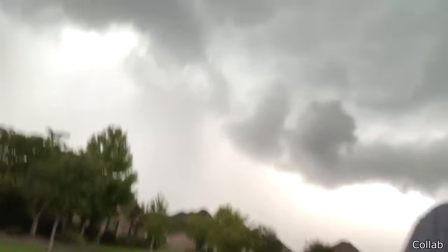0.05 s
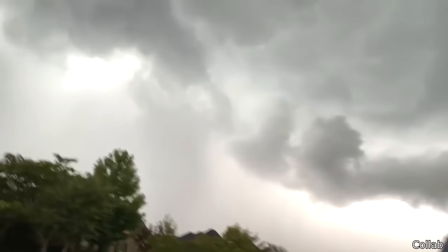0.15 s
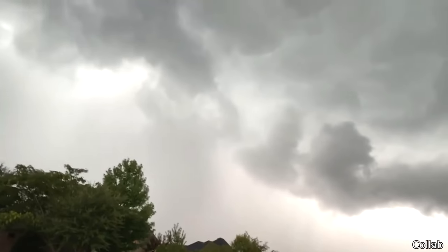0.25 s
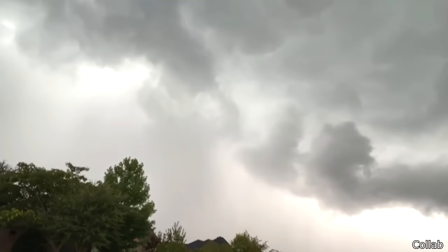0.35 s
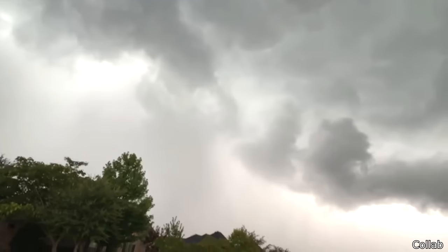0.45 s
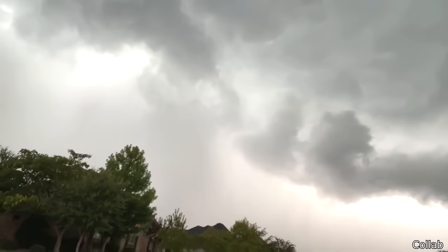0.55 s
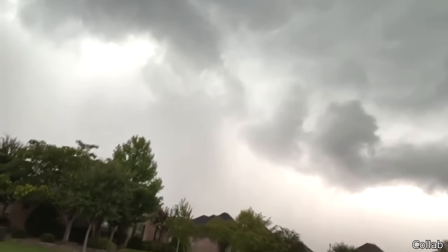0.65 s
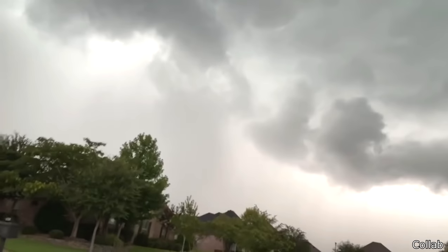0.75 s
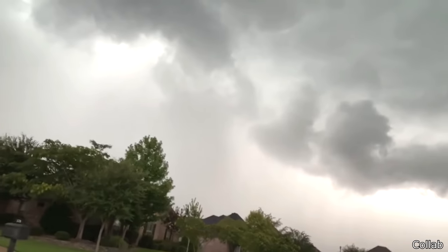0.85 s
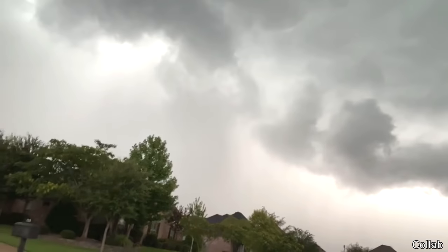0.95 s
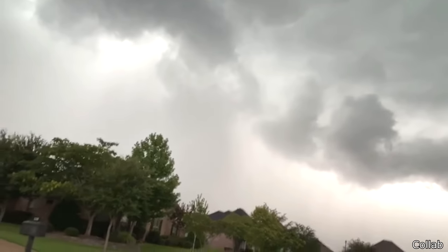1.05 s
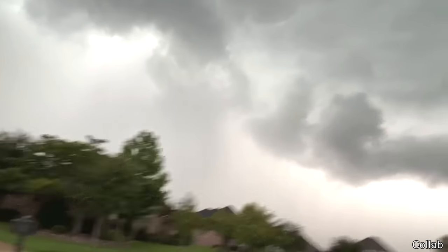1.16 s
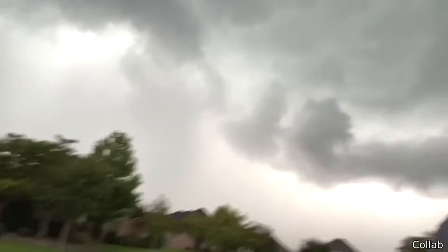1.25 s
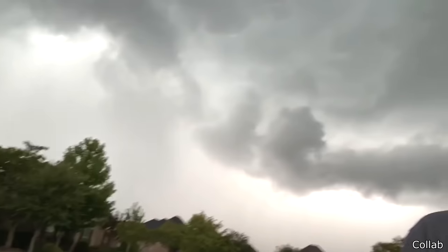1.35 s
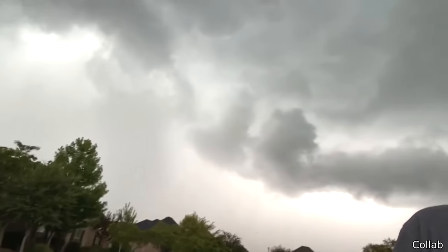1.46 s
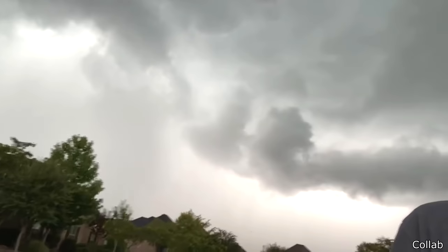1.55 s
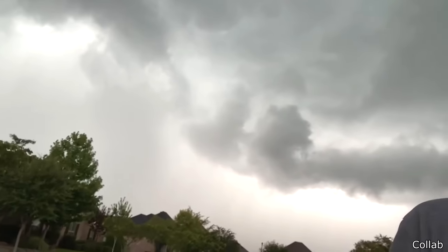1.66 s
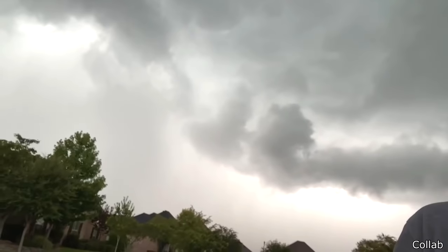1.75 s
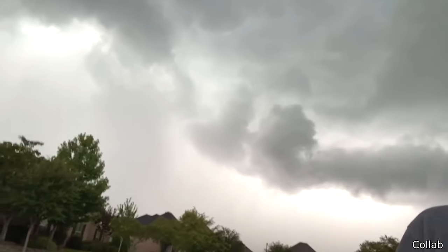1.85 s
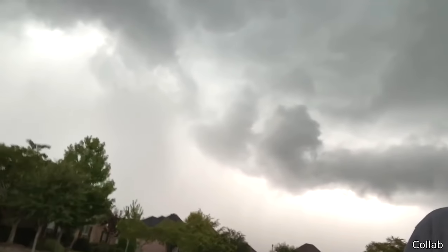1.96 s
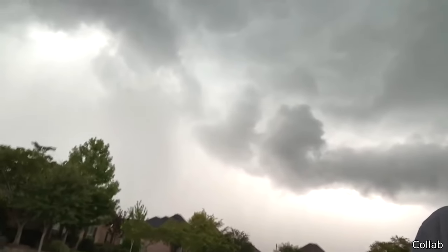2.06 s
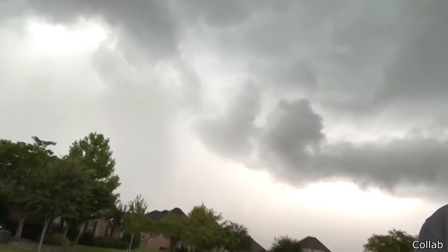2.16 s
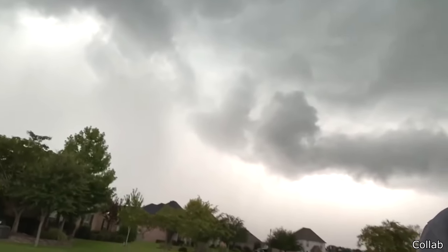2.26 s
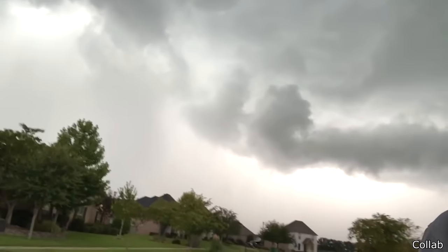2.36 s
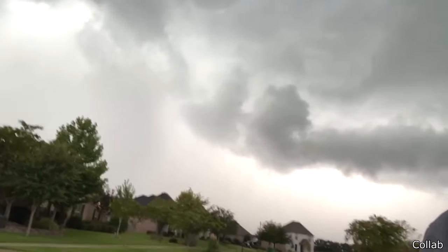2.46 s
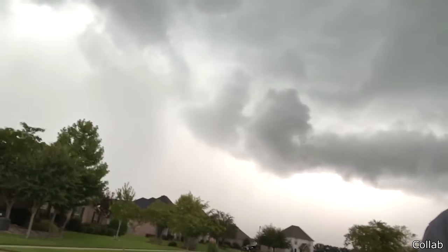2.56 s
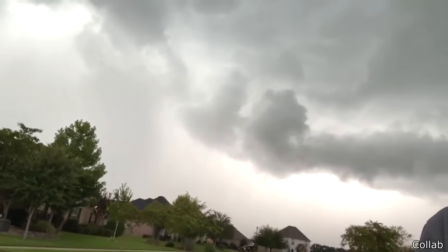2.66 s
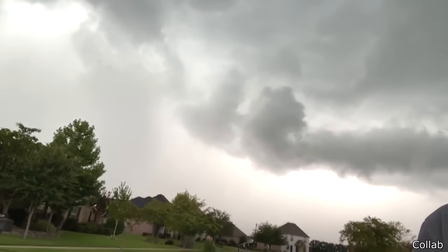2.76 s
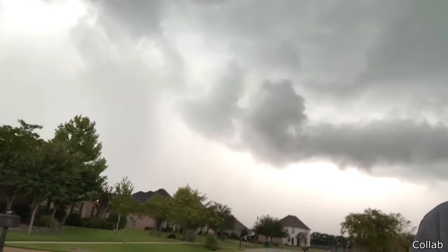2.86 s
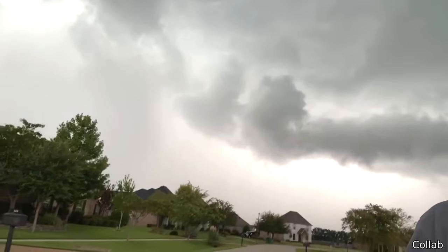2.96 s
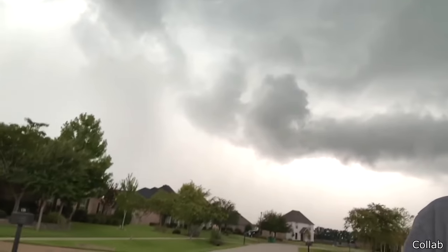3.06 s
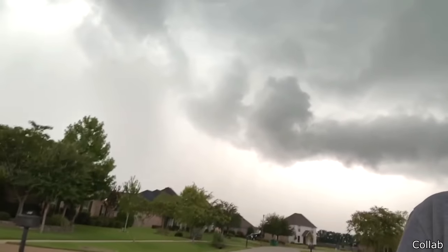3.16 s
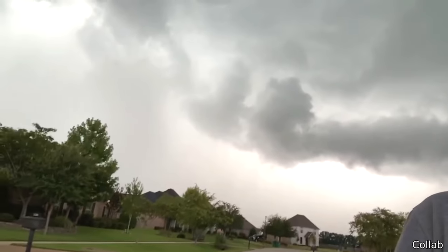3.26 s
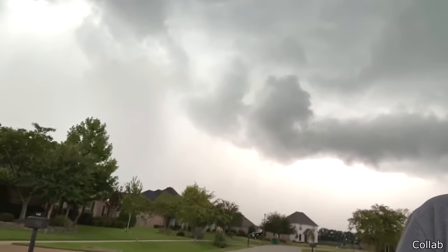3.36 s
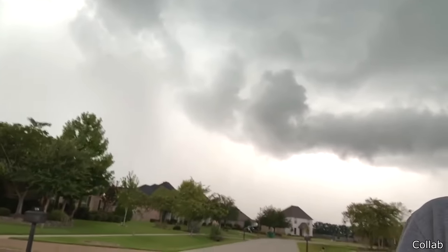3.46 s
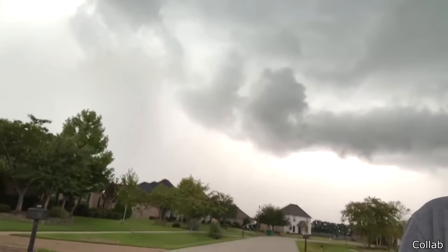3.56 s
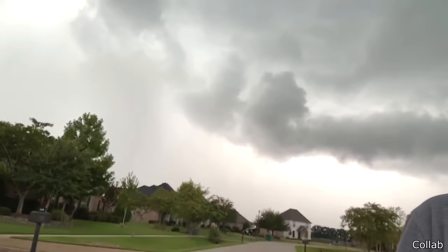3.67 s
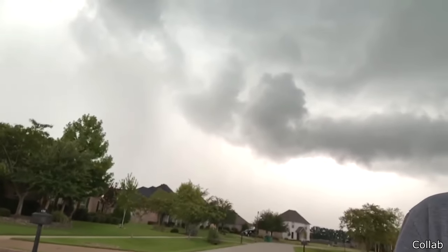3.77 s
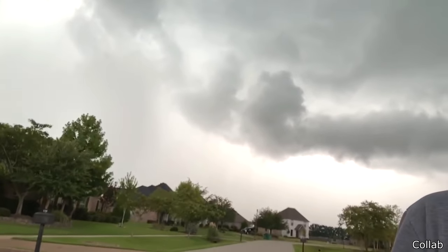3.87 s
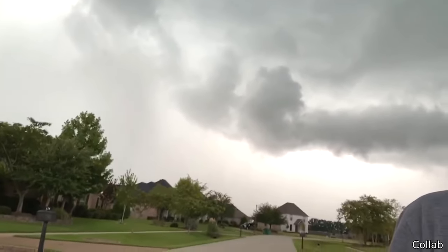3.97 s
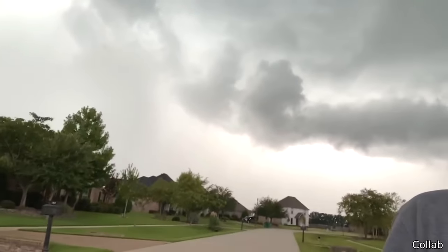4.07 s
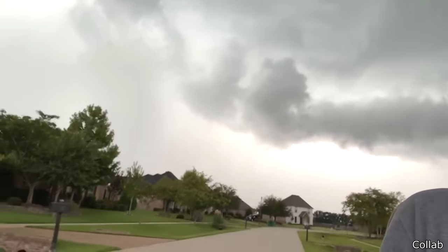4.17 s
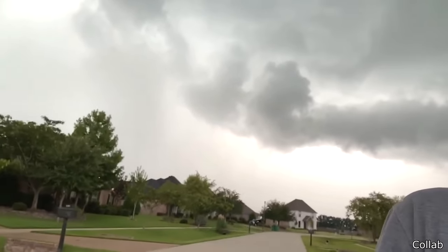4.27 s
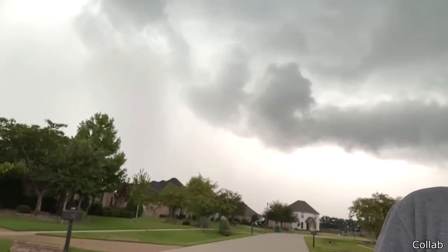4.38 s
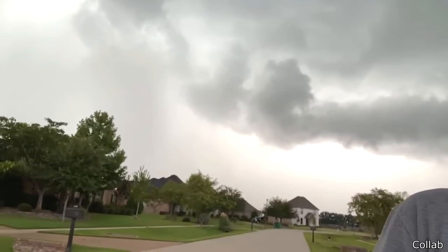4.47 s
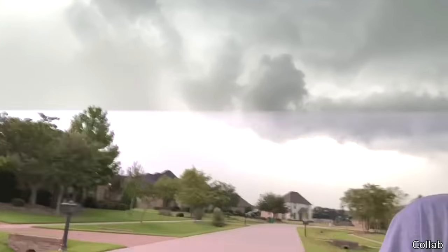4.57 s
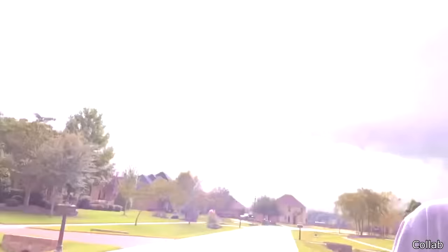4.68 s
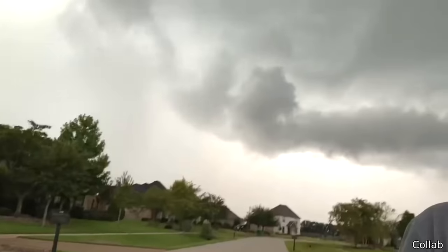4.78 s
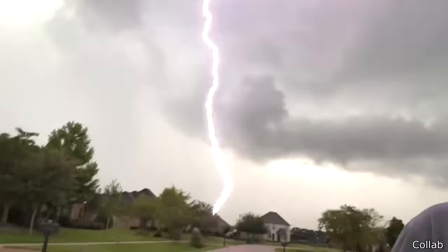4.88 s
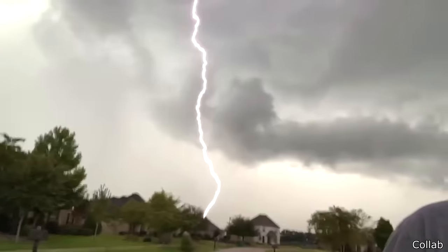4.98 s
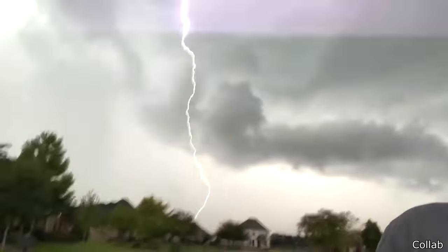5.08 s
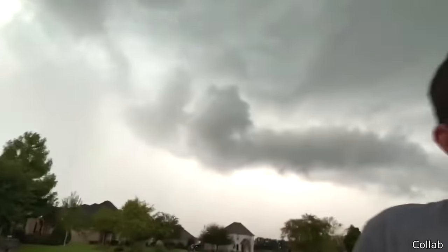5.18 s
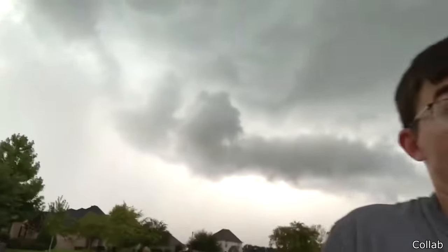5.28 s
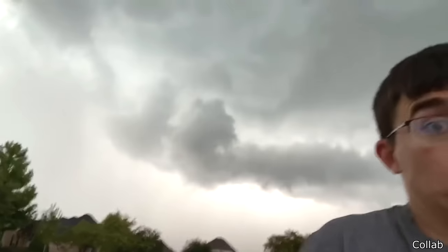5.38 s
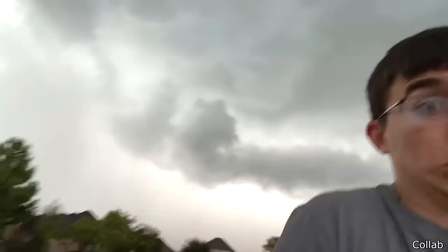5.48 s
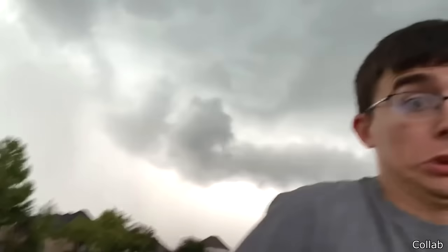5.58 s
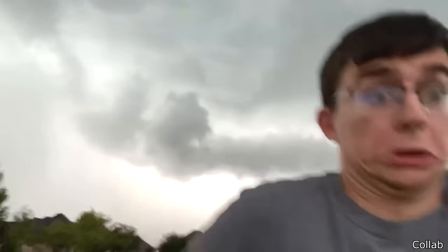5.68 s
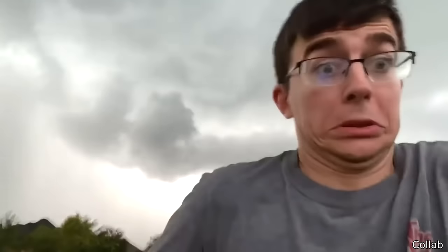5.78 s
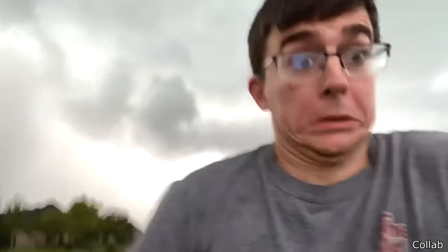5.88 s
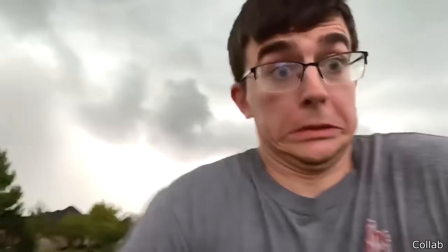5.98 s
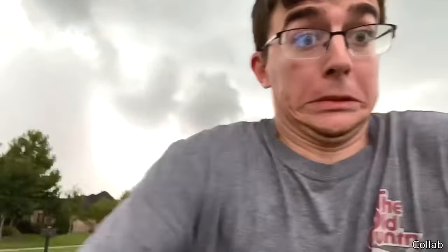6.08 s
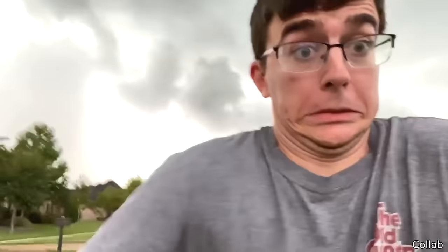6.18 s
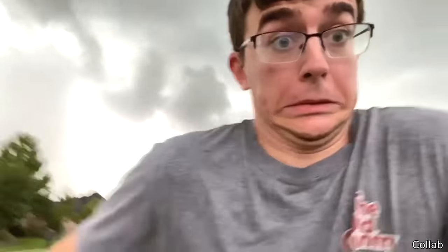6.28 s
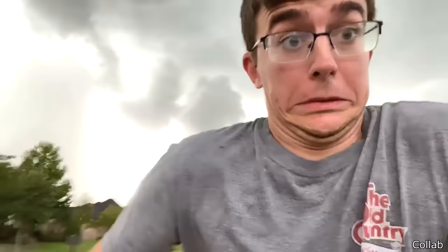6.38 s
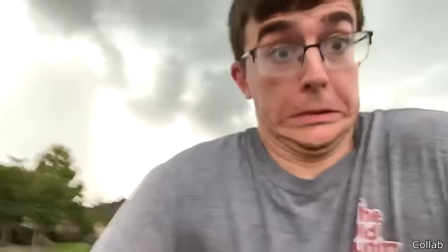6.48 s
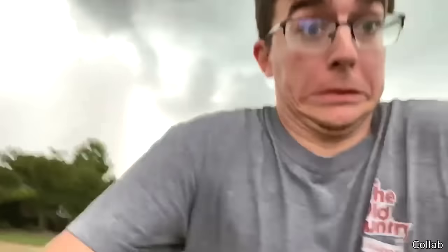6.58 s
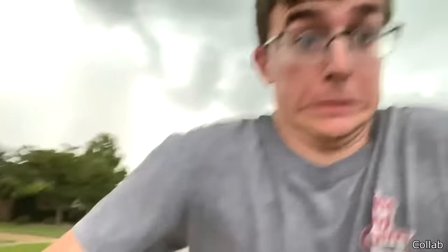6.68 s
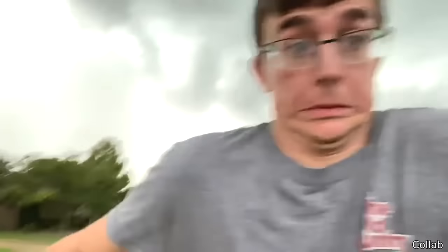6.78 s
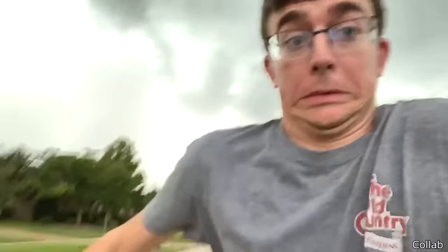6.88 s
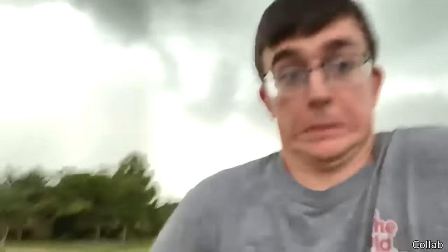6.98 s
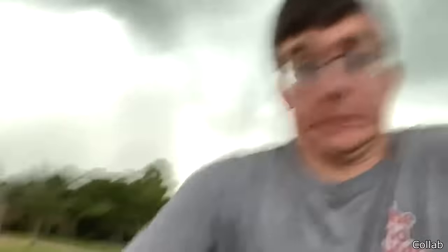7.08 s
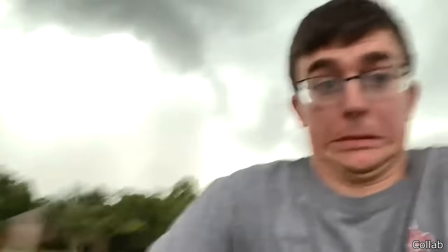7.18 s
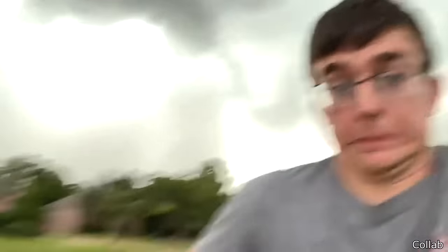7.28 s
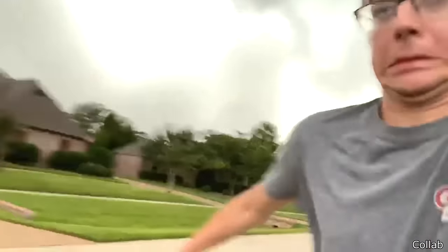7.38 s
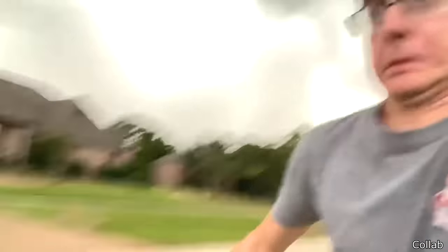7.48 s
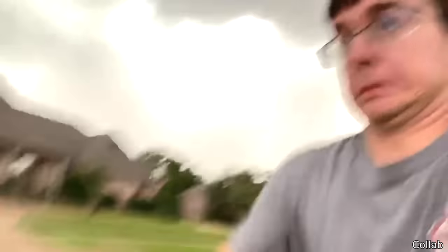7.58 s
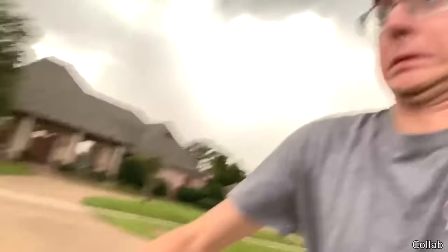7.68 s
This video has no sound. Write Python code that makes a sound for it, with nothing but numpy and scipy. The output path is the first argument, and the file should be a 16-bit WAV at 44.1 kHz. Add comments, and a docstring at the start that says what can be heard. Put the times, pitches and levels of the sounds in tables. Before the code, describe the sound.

Five and a half seconds of bright insect hiss and low wind, suddenly broken by a violent nearby thunderclap with crackling distortion and a duller rumble.

```python
"""Cicadas hiss in the trees of a suburban street; a katydid rasps and a tree frog calls over a low wind.
Then close thunder breaks in: a bright tearing, heavy claps that overload the hand-held microphone, and a
duller roll; the recorder's gain drops and the insects fade with it. The thunder is a stream of shocks from a
crooked lightning channel. Insects and wind are coloured noise, the frog a few sine waves, ticks noise puffs."""
import sys
import numpy as np
from scipy import signal
from scipy.fft import rfft, irfft, next_fast_len
from scipy.io import wavfile
from scipy.ndimage import uniform_filter1d, map_coordinates

SR = 44100
rng = np.random.default_rng(int(sys.argv[2]) if len(sys.argv) > 2 else 0)


def waveform_to_disk(signal):
    """Save audio, clipped to [-1, 1], as 16-bit WAV at the path in sys.argv[1]."""
    frames = np.transpose(np.atleast_2d(signal))
    scaled = np.clip(frames, -1, 1) * 32767
    samples = np.round(scaled).astype(np.int16)
    wavfile.write(sys.argv[1], SR, samples)


N = 341031  # length in samples
TOP_HZ = 15800  # band limit of the microphone


def thunder():
    """Shocks lose treble in the air, bounce off the street and scatter off houses; overload crackles join in."""
    through_distance = through_air(roll() + rattle() + claps())
    direct = off_the_street(through_distance + crackle()) + spits() + overload_crackles()
    return direct + houses(direct)


# Strength of the stream of shocks between the claps: [t/s, level/dB, deep part against it level/dB]
ROLL = [(5.635, -27.5, -6), (5.69, -30, 1), (5.8, -35, 6), (5.88, -22.5, -1), (6.1, -19.5, -3),
        (6.17, -29, -7), (6.31, -25.5, 1), (6.44, -25, -2), (6.55, -22.5, -1), (6.66, -26.5, 2.5),
        (6.92, -26, -1), (7.05, -25.5, -7.5), (7.16, -26, -5.5), (7.36, -26.5, -5), (7.52, -29, -1),
        (7.63, -25, -13), (7.72, -30.5, -5.5)]
# The three colours of a shock, low to high: [f/Hz, relative level/dB]
DEEP = [(20, -24), (35, -30), (50, 0), (80, 1.5), (130, 1), (190, -5), (350, -25), (1500, -55)]
BOOM = [(50, -22), (130, -10), (200, 1), (320, 0), (600, -5), (1200, -12), (1800, -15.5), (2600, -23.5),
        (4000, -31.5), (7000, -62), (16000, -88)]
CRACK = [(100, -16), (500, -1.5), (1100, -0.5), (2000, -5), (4000, -9), (5500, -14), (7000, -28.5),
         (10000, -29), (12500, -59.5), (16000, -73)]


def roll(deep_db=-0.8, boom_db=-1.5, crack_db=-15, attack_s=0.0012, rate=1100, scatter_db=0.0,
         peal_db=1.3, own_db=1.5):
    """The crooked channel sends a dense stream of long and short shocks that bunch into peals."""
    strength, depth = curves(ROLL)
    deep_gain = amp(strength + depth + deep_db)
    boom_gain = amp(strength + boom_db)
    crack_gain = amp(strength + crack_db) + tearing()
    peals = peal_db * wobble(60)  # shared by all three colours
    out = np.zeros((2, N))
    for colour, gain in (DEEP, deep_gain), (BOOM, boom_gain), (CRACK, crack_gain):
        stream = shocks(N, rate, scatter_db) * amp(peals + own_db * wobble(40))
        voice = coloured(stream, colour)[:, :N]
        out += voice / voice.mean(0).std() * gain
    return out * arrived(attack_s)


def rattle(db=-7, rate=170, scatter_db=2.5, centre_hz=1050, q=10, count=10):
    """Kinks in the far channel send short trains of shocks that knock at middle pitches all through the roll."""
    strength, _ = curves(ROLL)
    pitches = centre_hz * 2 ** np.linspace(-.9, .9, count)
    knocks = 0
    for hz in pitches:
        # low pitches are made stronger
        knocks = knocks + resonance(shocks(N, rate / count, scatter_db), hz, q) * centre_hz / hz
    knocks = filtered(knocks, lambda hz: 1 / (1 + (hz / 2600) ** 6))
    return amp(db + strength) * unit(knocks) * arrived(0.01006)


# Claps, where a whole stretch of the channel is heard at once: [t/s, length t/s, boom level/dB,
# deep part against the boom level/dB, crack against the boom level/dB, boom pitch f/Hz]
CLAPS = [(5.612, 0.015, -40.5, 0, -1, 350), (5.636, 0.0081, -30.5, -6, 4, 664),
         (5.659, 0.0085, -31, -6, 5, 600), (5.703, 0.0089, -28, -6, 4, 500),
         (5.712, .026, -17, -4, 1.5, 357), (5.779, 0.0032, -31, -8, 5, 700),
         (5.819, .01, -16.5, -11, -3, 330), (5.838, .01, -21.5, -10, -8, 450),
         (5.862, 0.0037, -28, -10, 2, 700), (5.878, 0.019, -19, -5, -4.5, 664),
         (5.918, 0.023, -22, -7, -10, 380), (5.983, 0.013, -20.5, -11, 1, 190),
         (6.031, 0.0047, -26, -10, 0, 700), (6.078, 0.0064, -23, -12, -4, 500),
         (6.103, .005, -22, -11, -2, 600), (6.11, 0.013, -13, -5.5, -4.5, 520),
         (6.12, 0.032, -8.5, -3, -15.5, 420), (6.182, 0.056, -22, -6, -22, 330),
         (6.248, .012, -19.5, 0, -21, 383), (6.337, .009, -21, -9, -6, 300),
         (6.346, 0.015, -12, -18, -16, 277), (6.361, 0.015, -15, 3, -13, 290),
         (6.39, 0.018, -21.5, -6, -8.5, 273), (6.412, 0.013, -16.5, -1.5, -19, 290),
         (6.456, 0.0078, -19.5, -9, -24, 266), (6.47, 0.022, -18, -12, -10.5, 300),
         (6.498, 0.021, -11.5, -4, -24, 230), (6.554, 0.0088, -18.5, -12, -7, 300),
         (6.564, 0.013, -9.5, -14, -11, 218), (6.587, 0.013, -11, 2, -12.5, 200),
         (6.76, 0.016, -19, -4.5, -19, 328), (6.784, 0.025, -18.5, -8, -18, 320),
         (6.818, 0.025, -23, -9, -26, 230), (6.848, 0.024, -21.5, -2.5, -22, 200),
         (6.942, 0.01, -24.5, -7, -16, 460), (7.061, 0.0069, -20, -1, -20, 200),
         (7.104, .02, -23.5, -4, -14, 300), (7.238, 0.045, -22, -5, -26, 260),
         (7.305, 0.019, -22.5, -5, -21, 260), (7.355, 0.015, -23.5, -5, -21, 290),
         (7.456, 0.014, -21, -13, -20, 328), (7.547, .015, -17, -17, -30, 310),
         (7.571, 0.016, -20.5, -7, -29, 320), (7.591, .013, -18, -2, -31, 302),
         (7.652, 0.013, -18, -1.5, -31, 262)]


def claps(boom_db=0, crack_db=0, deep_lag_s=0.0024, rate=2400, scatter_db=2, rise_s=0.0026, fade_db=2,
          pitched_db=6, q=3):
    """Each clap is a short volley of strong shocks; a resonance gives its boom a rough pitch, the deep part trails."""
    out = np.zeros((2, N))
    for s, length, level, depth_db, bright_db, pitch_hz in CLAPS:
        t = np.arange(int(length * SR)) / SR
        strength = (1 - np.exp(-t / rise_s)) * amp(-fade_db * t / length)

        def volley(colour):
            """A fresh volley of shocks in one colour."""
            return coloured(strength * shocks(len(t), rate, scatter_db, spread_ms=.12, count=4096), colour)

        deep, boom, crack = volley(DEEP), volley(BOOM), volley(CRACK)
        boom = boom + amp(pitched_db) * resonance(boom, pitch_hz, q)
        parts = (deep, depth_db, deep_lag_s), (boom, boom_db, 0), (crack, bright_db + crack_db, 0)
        for voice, part_db, lag_s in parts:
            energy = np.sum(voice.mean(0) ** 2) + 1e-12
            add(out, s + lag_s, voice * amp(level + part_db) * np.sqrt(len(t) / energy))
    return out


# Overload crackles of the microphone on the heaviest claps, levels before the lifts below: [t/s,
# click level/dB, upper edge f/Hz, thud against the click level/dB, fizz against the click level/dB]
OVERLOADS = [(5.642, -22, 9500, -10, -18), (5.663, -12.5, 9500, -22, -19), (5.7145, -13, 9500, -3, -19),
             (5.7362, -12, 9500, -17, -22), (5.794, -14, 9000, -18, -18), (5.821, -15, 9500, 1.5, -22),
             (5.882, -13.5, 10000, 3, -26), (6.1266, -7.5, 14500, -6, -24),
             (6.143, -11, 14500, -3.5, -21.5), (6.255, -23, 11000, 1, -21), (6.289, -33, 11000, -5, -20),
             (6.3573, -10.5, 14500, -3, -25), (6.366, -18, 15000, -3, -22), (6.417, -24.5, 12000, -4, -20),
             (6.473, -24, 14000, 5, -21), (6.501, -25, 14000, 10, -21), (6.519, -27, 14000, -6, -21),
             (6.5565, -25, 11000, 1, -22), (6.5665, -12.5, 13000, 4.5, -29), (6.5697, -13, 15000, -2, -29),
             (6.5893, -3, 15500, -6, -29.5), (6.5931, -3, 15500, -5, -31), (6.598, -11, 6000, -4, -25)]
# Colour of the crackles: [f/Hz, relative level/dB]
OVERLOAD_COLOUR = [(200, -6), (1500, -5.5), (4000, 6.5), (7000, 0), (10500, -1), (12500, -17), (14500, -8),
                   (16000, -21)]


def overload_crackles(db=4, t60=0.065, build_s=0.0036, thud_db=6):
    """A sharp click of the overloaded microphone inside a short fizz, with one low thud."""
    out = np.zeros((2, N))
    t = np.arange(-(SR // 50), SR // 20) / SR  # the click is at 0
    fizz = amp(-60 * np.maximum(t, 0) / t60) * np.exp(np.minimum(t, 0) / build_s)
    thud = coloured(np.ones((2, 1)), BOOM)
    thud = thud / np.abs(thud).max()
    for s, click_db, edge_hz, weight_db, fizz_db in OVERLOADS:
        click = (t == 0) + amp(fizz_db) * fizz * rng.standard_normal((2, len(t)))
        low_pass = signal.butter(6, min(edge_hz, TOP_HZ), fs=SR, output="sos")
        click = signal.sosfilt(low_pass, click)
        add(out, s + t[0], amp(click_db + db) * coloured(click, OVERLOAD_COLOUR))
        add(out, s, amp(click_db + weight_db + thud_db) * thud)
    return out


def crackle(db=-4.0, rate=200, scatter_db=1.5, centre_hz=2500, q=7, count=8):
    """Thin branches of the channel spit single bright cracks at scattered pitches."""
    pitches = centre_hz * 2 ** np.linspace(-.9, .7, count)
    cracks = sum(resonance(shocks(N, rate / count, scatter_db), hz, q) for hz in pitches)
    cracks = filtered(cracks, lambda hz: 1 / (1 + (hz / 5500) ** 6))
    return amp(db) * tearing() * unit(cracks)


# The loudest ringing cracks of the thin branches: [t/s, peak level/dB, pitch f/Hz]
SPITS = [(5.7346, -6, 3840), (5.7618, -21, 3010), (5.791, -15, 3020), (5.802, -12, 3000),
         (5.8192, -13, 4100), (6.0167, -23, 3400), (6.0806, -17.5, 2870)]


def spits(db=0, q=6, life_s=0.0012):
    """A thin branch lets off a brief burst of shocks, made from noise, that rings at one pitch."""
    out, t = np.zeros((2, N)), np.arange(SR // 50) / SR
    for s, peak_db, pitch_hz in SPITS:
        burst = rng.standard_normal((2, len(t))) * t * np.exp(-t / life_s)
        ring = resonance(resonance(burst, pitch_hz, q / 2), pitch_hz, q / 2)
        add(out, s, amp(peak_db + db) * ring / np.abs(ring).max())
    return out


# Higher branches tear briefly in the late roll: [t/s at the height, half width t/s, level/dB]
LATE_TEARS = [(6.75, 0.14, -46), (7.05, 0.041, -37), (7.3, 0.2, -44.5), (7.67, 0.051, -54)]
TEAR_DB, TEAR_END_S, TEAR_RELEASE_S = -28.5, 6.125, 0.0038  # tearing of the nearest branches


def tearing(attack_s=0.042):
    """Strength curve: swells quickly, holds, stops once the nearest branches are heard; higher ones follow faintly."""
    past_end = np.maximum(np.arange(N) / SR - TEAR_END_S, 0)
    near = amp(TEAR_DB) * arrived(attack_s) * np.exp(-past_end / TEAR_RELEASE_S)
    return near + sum(amp(db) * swell(s, width) for s, width, db in LATE_TEARS)


def shocks(length, rate, scatter_db, lead_ms=0.044, spread_ms=.11, count=N):
    """Fronts of random size, time and direction; the direction sets how far apart they meet the two ports."""
    when, size, bearing = rng.random(count), rng.standard_normal(count), rng.standard_normal(count)
    at = np.flatnonzero(when[:length] < rate / SR)  # rate is in shocks a second
    push = rng.choice([-1, 1], count)[at] * amp(scatter_db * size[at])
    lag = np.round((lead_ms + spread_ms * bearing[at]) * SR / 1000).astype(int)
    ports = [np.bincount(np.clip(at + d, 0, length - 1), push, length) for d in (0, lag)]
    return np.array(ports)


FLASH_S, ARRIVAL_S = 5.0, 5.635  # the stroke, and when the roll from the nearest part of its channel sets in


def arrived(attack_s):
    """The stream of shocks sets in with its first front."""
    since = np.maximum(np.arange(N) / SR - ARRIVAL_S, 0)
    return 1 - np.exp(-since / attack_s)


def nearness(s):
    """Shortest path over the path of a shock heard at time s: later shocks come from farther away."""
    shortest = ARRIVAL_S - FLASH_S
    return shortest / np.maximum(s - FLASH_S, shortest)


def through_air(x, dull_hz=3500, loss=3.6):
    """Air swallows treble: what lies above a dull core shrinks as the path grows."""
    core = filtered(x, lambda hz: 1 / np.sqrt(1 + (hz / dull_hz) ** 4))
    return core + (x - core) * nearness(np.arange(N) / SR) ** loss


# Lag of the bounce off the street, long for shocks from overhead and short for those from
# the foot of the channel: [t/s, lag t/ms]
BOUNCE_LAG = [(5.635, 6.1), (5.74, 6.2), (6.04, 5.84), (6.12, 0.97), (6.25, 2.8), (6.35, 3.13), (6.52, 4.6),
              (6.92, 6.3), (7.28, 6.7), (7.4, 6.3), (7.53, 5.8), (7.72, 6.6)]


def off_the_street(x, share=0.38, dull_hz=4500):
    """Each shock comes again off the ground; the changing lag sweeps a hollow comb through the thunder."""
    lag_ms, = curves(BOUNCE_LAG)
    soft = filtered(x, lambda hz: 1 / np.sqrt(1 + (hz / dull_hz) ** 4))
    at = np.arange(N) - lag_ms * SR / 1000
    bounce = np.array([np.interp(at, np.arange(N), port) for port in soft])
    return (x + share * bounce) / np.hypot(1, share)


def houses(x, t60=0.2, db=-17, delay_s=0.017):
    """House fronts and trees scatter the middle range back from all sides, as a fading noise tail."""
    t = np.arange(SR // 2) / SR
    scatter = rng.standard_normal((2, len(t))) * amp(-60 * t / t60) * (t > delay_s)
    colour = [(100, -7.5), (280, -0.5), (550, 7.5), (2000, 3.0), (8000, -6.5)]  # f/Hz, level/dB
    tail = coloured(scatter / np.linalg.norm(scatter[0]), colour)
    return amp(db) * signal.fftconvolve(x, tail, axes=1)[:, :N]


# Colour of the cicadas: [f/Hz, relative level/dB]
CICADAS = [(1800, -42), (2600, -19), (3050, -10.5), (3400, -0.5), (3700, 0.5), (4200, -1), (5100, 1.5),
           (6200, -4), (7200, -17.5), (8500, -18.5), (10600, -21.5), (11500, -30), (12500, -72),
           (15000, -36.5)]
# The chorus swells a little now and then: [t/s at the height, half width t/s, rise level/dB]
CHORUS_SWELLS = [(.45, 0.46, 0.1), (3.35, 0.39, 1), (4.25, 0.27, 0.9)]
CICADA_DB = -40.5  # level before swells and wobbles


def cicadas(drift_db=-0.03, flutter_db=0.28):
    """Many far cicadas merge into one steady hiss, made from noise."""
    swells_db = sum(rise_db * swell(s, width) for s, width, rise_db in CHORUS_SWELLS)
    level_db = CICADA_DB + swells_db + drift_db * wobble(4.12) + flutter_db * wobble(31)
    return amp(level_db) * rush(CICADAS, patchy_db=1.0)


# Loudness of the katydid's unbroken trill: [t/s, level/dB]
KATYDID = [(0, -59), (.36, -52.5), (.75, -60), (1.9, -59.5), (2.6, -54), (3.2, -61), (3.8, -66.5),
           (5.4, -56.5)]
# Colour of its rasp: [f/Hz, relative level/dB]
RASP = [(5000, -51), (7500, 0), (8500, -1.5), (9600, 4.5), (10600, 0), (11500, -14.5), (13000, -51)]


def katydid(stroke_hz=12.1, first_s=0.063, sharp=0.4):
    """A steady trill of wing strokes, each a puff of high rasp."""
    level_db, = curves(KATYDID)
    turns = (np.arange(N) / SR - first_s) * stroke_hz + 0.047 * wobble(1.8)
    puffs = np.abs(np.cos(np.pi * turns)) ** (2 * sharp)
    return amp(level_db) * unit(puffs) * rush(RASP, patchy_db=2.5)


# Tree frog calls: [t/s, length t/s, level/dB, pitch f/Hz, lower side line level/dB]
CALLS = [(0.445, 0.24, -41.5, 3720, -4), (1.39, .25, -45, 3705, -7), (2.29, .23, -47, 3730, -7),
         (3.165, .3, -45, 3710, -7), (4.085, .23, -45.5, 3730, -6)]


def frog(pulse_hz=390, upper_db=-7, scoop=.027, waver_db=1.5):
    """A whistle scoops up to a held pitch and drops at the end; its fast pulsing puts a line on either side."""
    out = np.zeros(N)
    for s, length, level, pitch_hz, lower_db in CALLS:
        u = np.linspace(-1, 1, int(length * SR))  # from start to end of the call
        hz = pitch_hz * (1 - scoop * np.abs(u - .1) ** 3 + .001 * wobble(45)[:len(u)])
        note = 0
        for k, db in (-1, lower_db), (0, 0), (1, upper_db):
            phase = 2 * np.pi * np.cumsum(hz + k * pulse_hz) / SR
            note = note + amp(db + waver_db * wobble(30)[:len(u)]) * np.sin(phase)
        add(out, s, amp(level) * unit(note) * (1 - u ** 4))
    return out


# Small ticks close to the microphone: [t/s, peak level/dB, length t/s, ring level/dB]
TICKS = [(0.026, -32.5, 0.05, 2), (0.041, -26.5, 0.0076, 14), (2.313, -37.5, 0.062, -12),
         (2.332, -35.5, .03, -10), (2.492, -42.5, 0.006, -2), (3.451, -39, 0.031, -9),
         (5.292, -40, 0.026, -9), (5.335, -43, 0.081, -12), (5.548, -41, 0.094, -12)]
# Colour of a tick: [f/Hz, relative level/dB]
TICK = [(200, -20), (750, 6), (1150, -7), (1400, -1.5), (2100, -1), (2700, -6.5), (4000, -13), (9000, -48)]


def ticks(ring_hz=1800, q=6, rise=0.26):
    """Short soft puffs of noise that swell and die away, some with a hollow ring from a resonance."""
    out, t = np.zeros((2, N)), np.arange(SR // 6) / SR
    for s, peak_db, length, ring_db in TICKS:
        u = t / (rise * length)
        puff = rng.standard_normal((2, len(t))) * u ** 2 * np.exp(-2 * u)
        tick = coloured(puff, TICK)
        tick = tick + amp(ring_db) * resonance(tick, ring_hz, q)
        add(out, s, amp(peak_db) * tick / np.abs(tick.mean(0)).max())
    return out


# Colours of the low wind and of the far trees: [f/Hz, relative level/dB]
RUMBLE = [(20, -43), (45, -4), (72, 0), (120, -4), (200, -10.5), (350, -20.5), (1000, -32), (3000, -70)]
TREES = [(150, -10), (400, -7.5), (750, 2.5), (1100, -6.5), (1500, -12.5), (2200, -19.5), (5000, -34),
         (11000, -47), (13000, -51)]
# Gusts in the far trees: [t/s at the height, half width t/s, rise level/dB]
GUSTS = [(.03, 0.3, 5), (2.4, 0.1, 2), (3.5, 0.22, 4), (4.5, 0.39, 5)]
# Soft bumps of air on the microphone: [t/s at the height, half width t/s, rise level/dB]
BUMPS = [(5.198, .016, 10.5), (5.245, .02, 5)]
WIND_DB, TREES_DB = -45.5, -54  # levels before bumps and gusts


def wind():
    """Moving air as noise: a low rumble with two soft bumps, and a sough of far trees that rises with each gust."""
    gust_db = sum(rise_db * swell(s, width) for s, width, rise_db in GUSTS)
    bump_db = sum(rise_db * swell(s, width) for s, width, rise_db in BUMPS)
    rumble = amp(WIND_DB + bump_db) * rush(RUMBLE, patchy_db=1.0)
    sough = amp(TREES_DB + gust_db) * rush(TREES, patchy_db=1.96)
    return rumble + sough


# How alike left and right are, 1 meaning the same: [f/Hz, likeness]
ALIKE = [(60, 0.83), (130, 0.96), (290, 0.7), (640, 0.17), (1400, -0.12), (3600, 0.09), (5000, -0.16),
         (7200, -0.39), (9000, 0.69)]


def rush(spectrum, patchy_db):
    """Stereo noise with patches of random gain in time and pitch; its centre has rms 1."""
    z = signal.stft(rng.standard_normal((2, N)), nperseg=512)[2]
    field = uniform_filter1d(rng.standard_normal(z.shape[1:]), size=6, axis=0)
    field = uniform_filter1d(field, size=22, axis=1)
    pair = signal.istft(z * amp(patchy_db * unit(field)), nperseg=512)[1][:, :N]

    def response(hz):
        """Colour for the middle and the side; less likeness gives more side."""
        width = np.tan(np.arccos(np.clip(along(ALIKE, hz), -.9, 1)) / 2)
        return amp(along(spectrum, hz)) * np.array([np.ones_like(hz), width])

    mid, side = filtered(pair, response)
    return np.array([mid + side, mid - side]) / mid.std()


def amp(db):
    """Decibels to gain."""
    return 10 ** (np.asarray(db) / 20)


def unit(x):
    """Scaled to rms 1."""
    return x / np.sqrt(np.mean(x ** 2) + 1e-20)


def along(points, hz):
    """(f/Hz, value) points read on a log axis."""
    f, v = np.transpose(points)
    return np.interp(np.log(hz + 1), np.log(f + 1), v)


def curves(rows):
    """One value per sample for each column after the time."""
    s, *cols = np.transpose(rows)
    return [np.interp(np.arange(N) / SR, s, c) for c in cols]


def wobble(rate):
    """A smooth random curve, rate knots a second."""
    knots = rng.standard_normal(int(N * rate / SR) + 4)
    return map_coordinates(knots, [np.arange(N) * rate / SR])


def swell(s, width):
    """A smooth rise to 1 at time s, and the fall after it."""
    return np.exp(-((np.arange(N) / SR - s) / width) ** 2)


def add(track, s, sound):
    """Mix a sound into a track at time s, cut off at the track's end."""
    part = track[..., round(s * SR):][..., :sound.shape[-1]]
    part += sound[..., :part.shape[-1]]


def filtered(x, response):
    """x times a response of frequency."""
    m = next_fast_len(N + SR // 2)
    return irfft(rfft(x, m) * response(np.fft.rfftfreq(m, 1 / SR)), m)[..., :N]


def coloured(x, spectrum, size=2048):
    """Stereo pulses through the filter with this spectrum that answers as early as it can (minimum phase)."""
    cepstrum = irfft(np.log(amp(along(spectrum, np.fft.rfftfreq(size, 1 / SR)))))
    fold = np.r_[1, np.full(size // 2 - 1, 2), 1, np.zeros(size // 2 - 1)]
    impulse = irfft(np.exp(rfft(cepstrum * fold)))
    return signal.fftconvolve(x, impulse[None], axes=1)


def resonance(x, hz, q):
    """A causal band-pass with gain 1 at its centre."""
    return signal.lfilter(*signal.iirpeak(hz, max(q, .5), SR), x)


# Typed fade of the street sounds as the recorder's gain drops: [t/s, drop level/dB]
GAIN_DROP = [(6.08, 0), (6.18, 9), (6.55, 10), (6.75, 16.5), (7.0, 21.5)]


def scene():
    """Everything leans a little to the right; the street's small sounds fade as the recorder's gain drops."""
    drop_db, = curves(GAIN_DROP)
    street = (cicadas() + katydid() + frog() + ticks() + wind()) * amp(-drop_db)
    return thunder() * amp([[-.4], [.4]]) + street * amp([[-.7], [.7]])  # left, right in dB


def record(dry):
    """The microphone rounds off the biggest peaks and keeps nothing above its band limit."""
    rounded = dry / (1 + np.abs(dry / .95) ** 5) ** (1 / 5)
    return filtered(rounded, lambda hz: hz < TOP_HZ)


dry = scene()
out = record(dry)
waveform_to_disk(out)
```